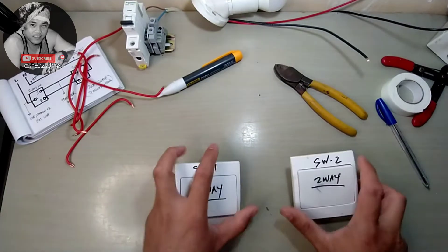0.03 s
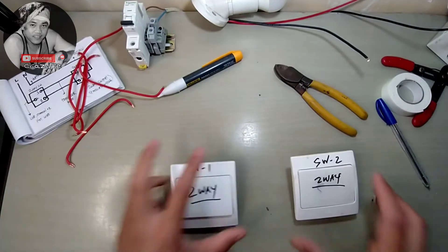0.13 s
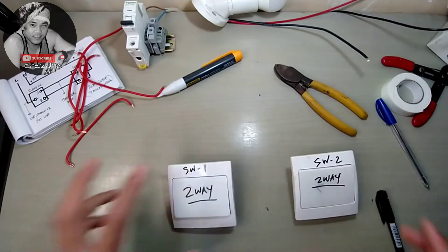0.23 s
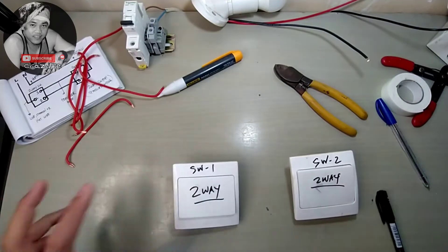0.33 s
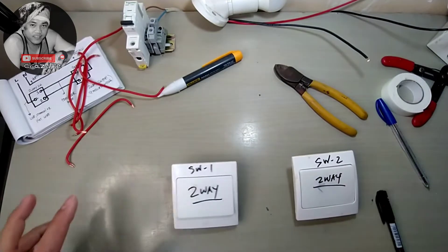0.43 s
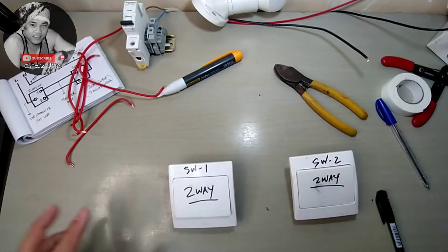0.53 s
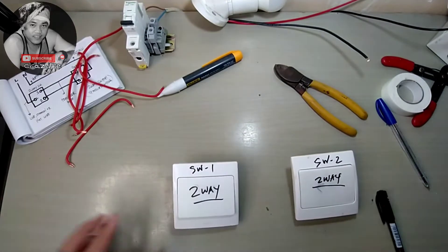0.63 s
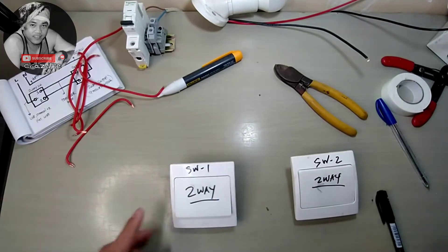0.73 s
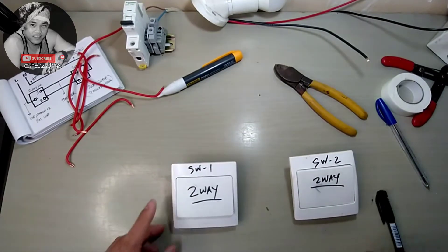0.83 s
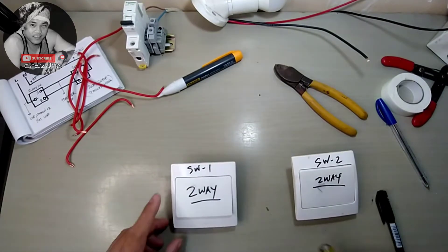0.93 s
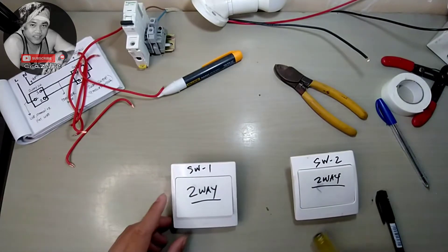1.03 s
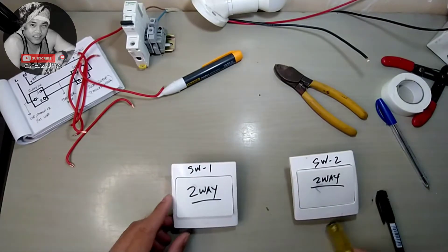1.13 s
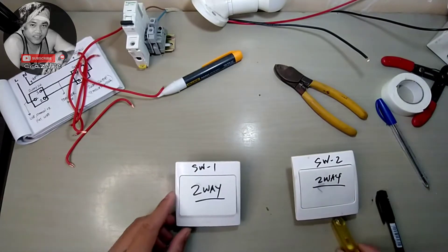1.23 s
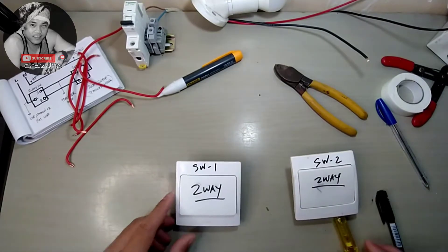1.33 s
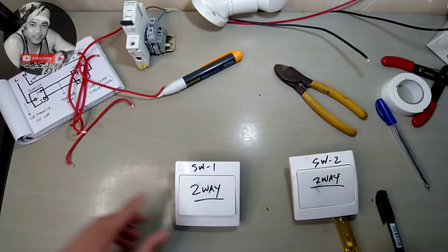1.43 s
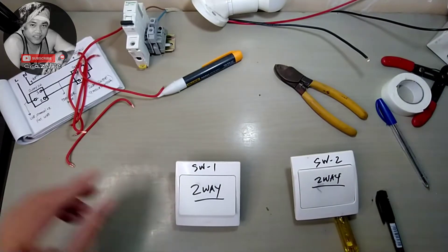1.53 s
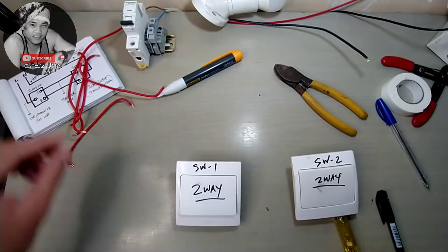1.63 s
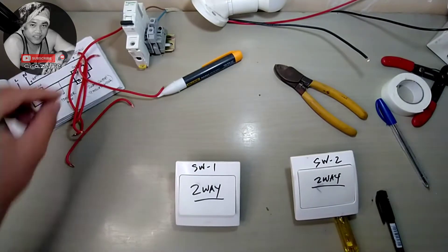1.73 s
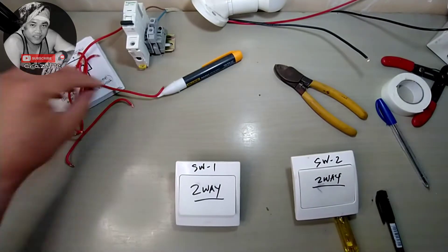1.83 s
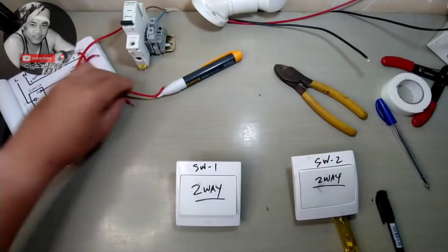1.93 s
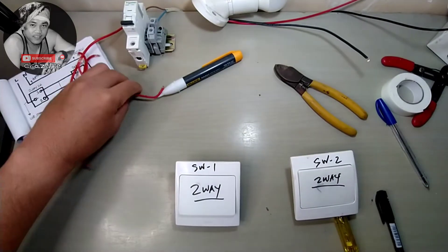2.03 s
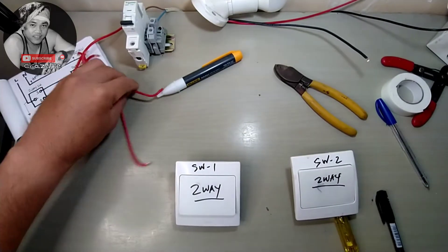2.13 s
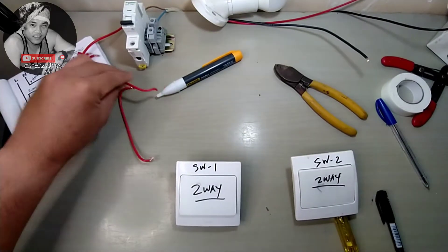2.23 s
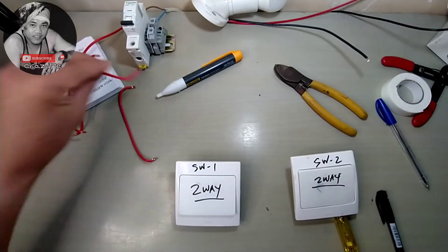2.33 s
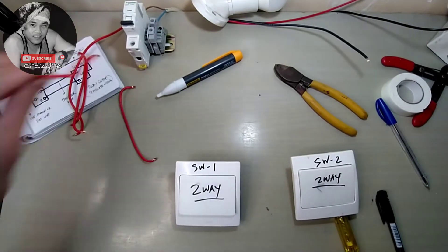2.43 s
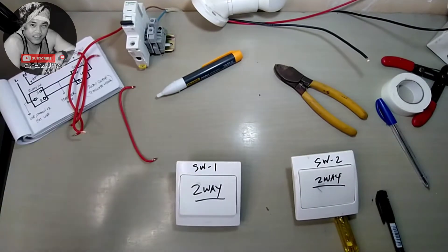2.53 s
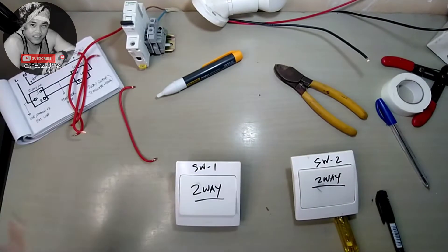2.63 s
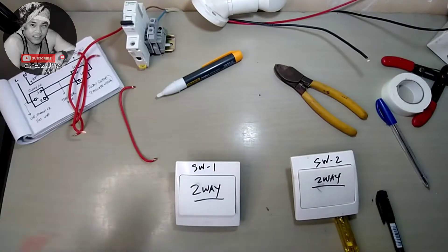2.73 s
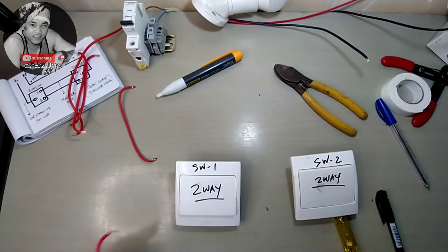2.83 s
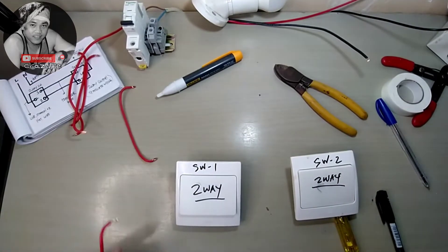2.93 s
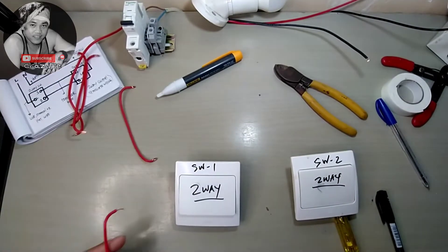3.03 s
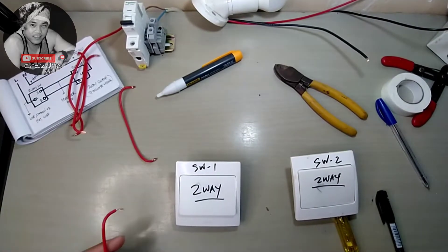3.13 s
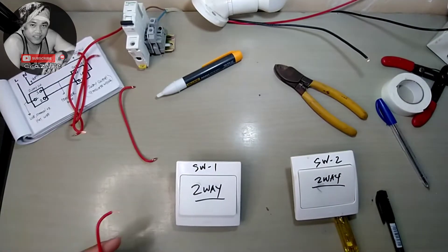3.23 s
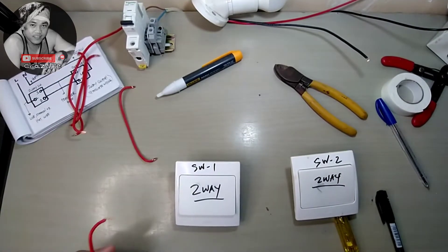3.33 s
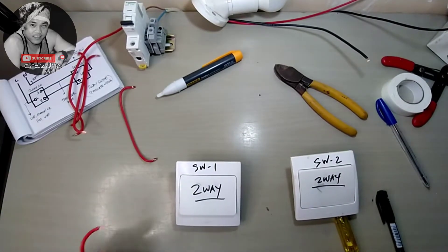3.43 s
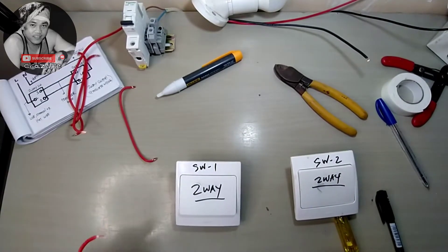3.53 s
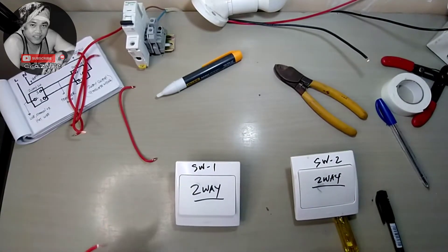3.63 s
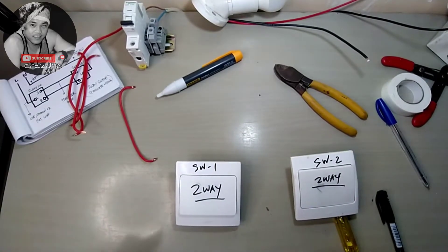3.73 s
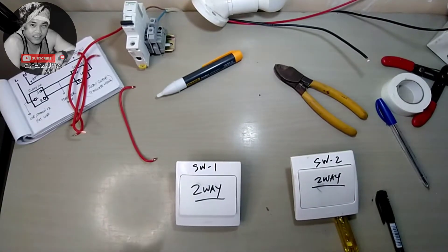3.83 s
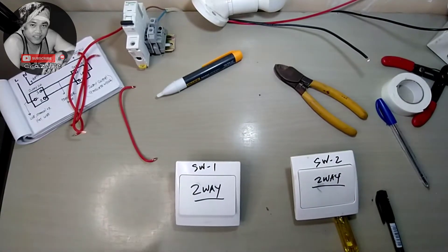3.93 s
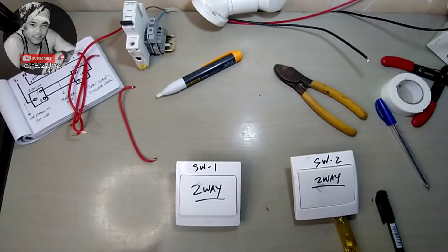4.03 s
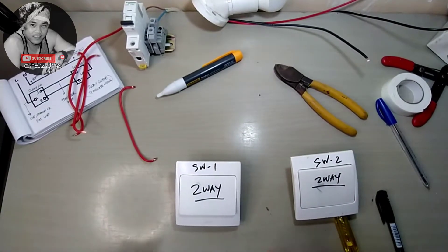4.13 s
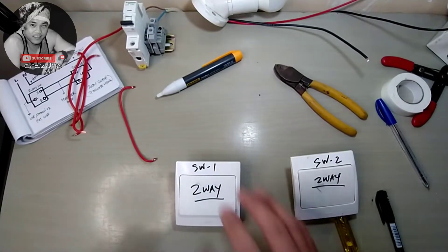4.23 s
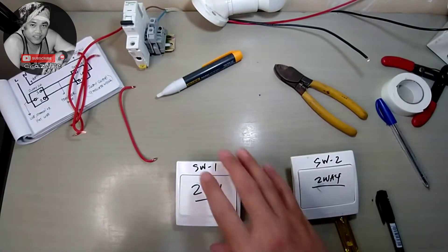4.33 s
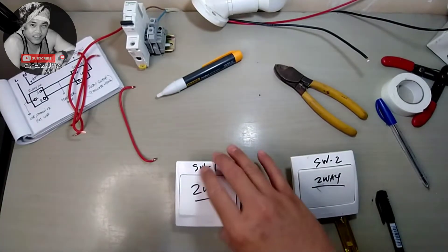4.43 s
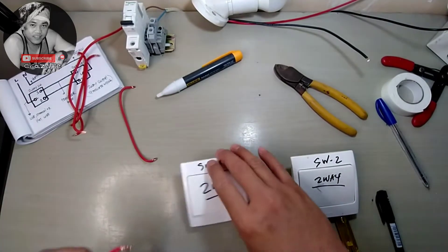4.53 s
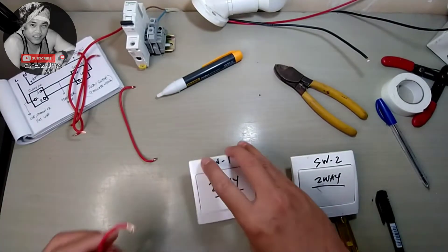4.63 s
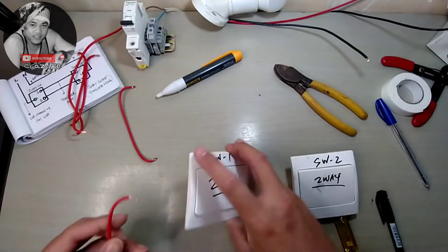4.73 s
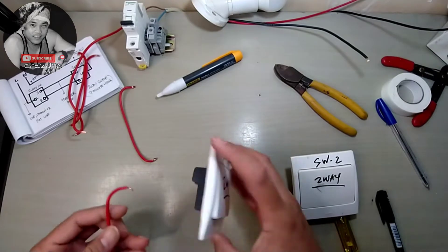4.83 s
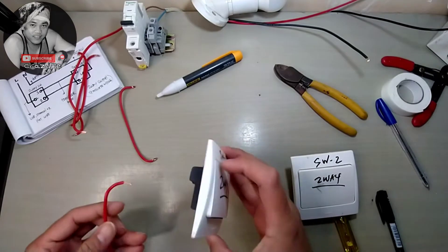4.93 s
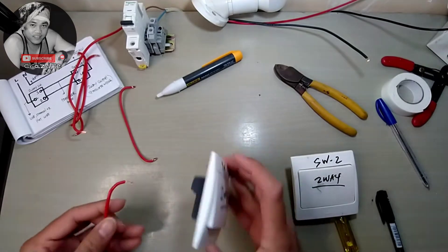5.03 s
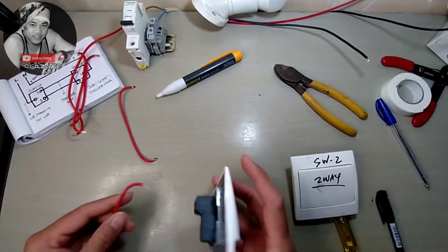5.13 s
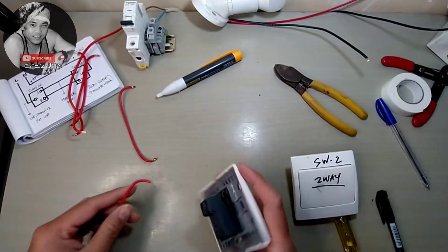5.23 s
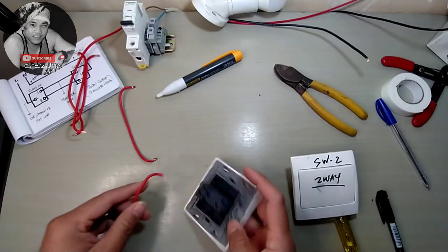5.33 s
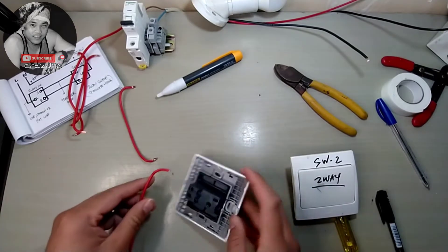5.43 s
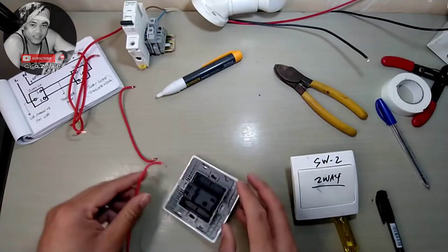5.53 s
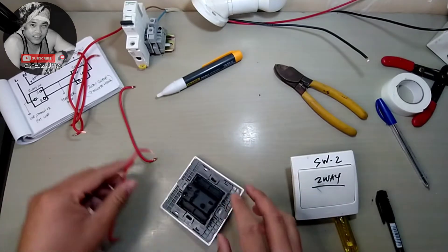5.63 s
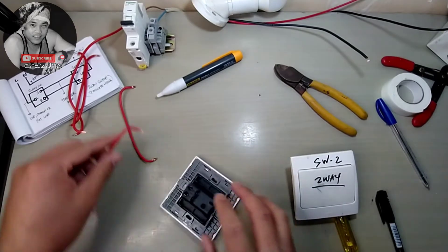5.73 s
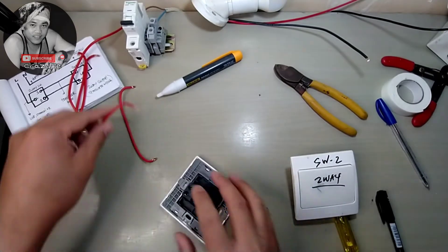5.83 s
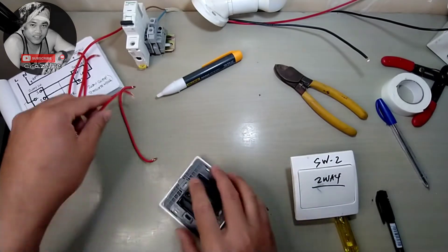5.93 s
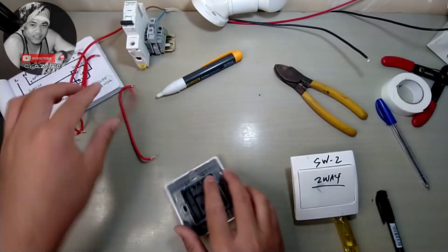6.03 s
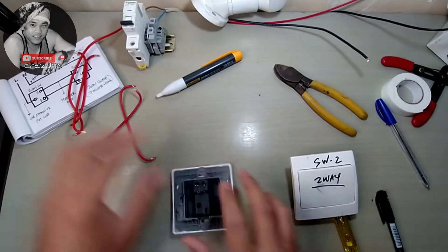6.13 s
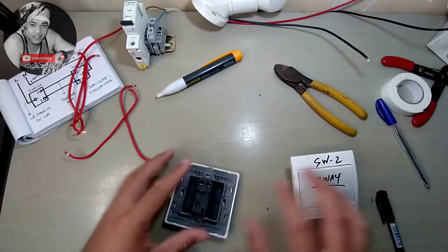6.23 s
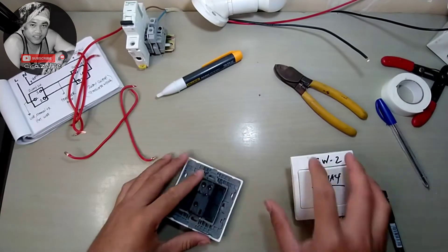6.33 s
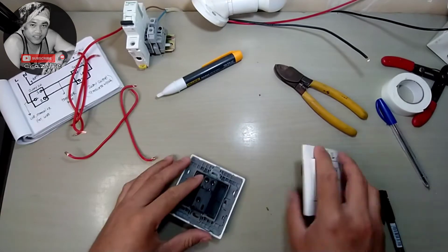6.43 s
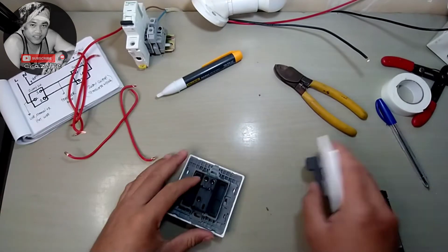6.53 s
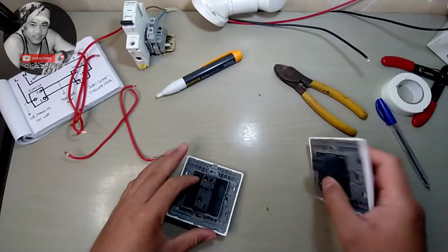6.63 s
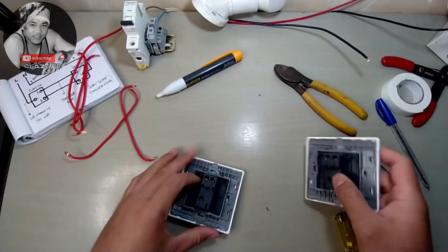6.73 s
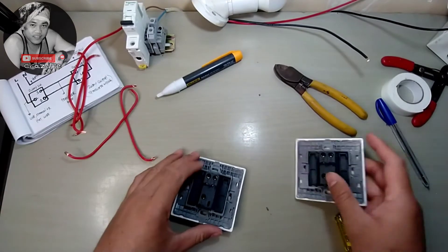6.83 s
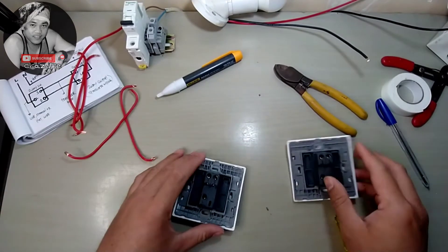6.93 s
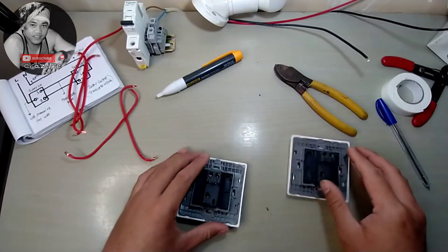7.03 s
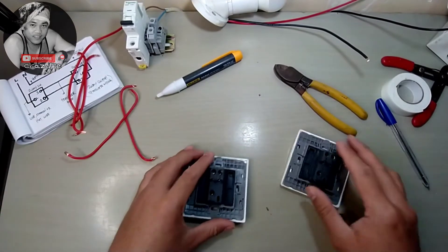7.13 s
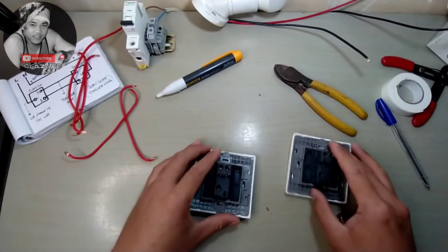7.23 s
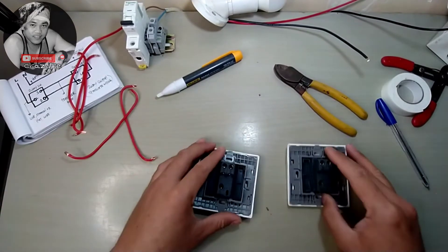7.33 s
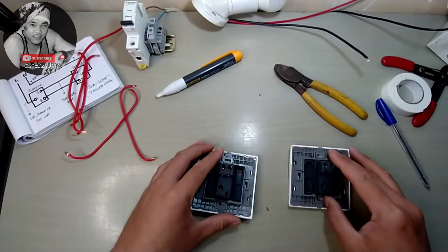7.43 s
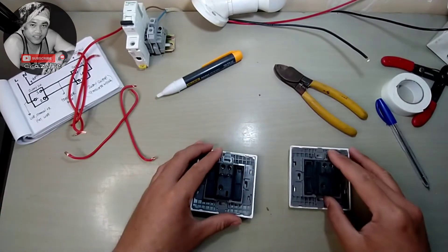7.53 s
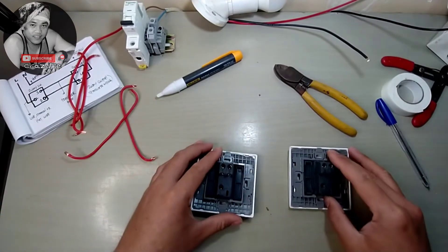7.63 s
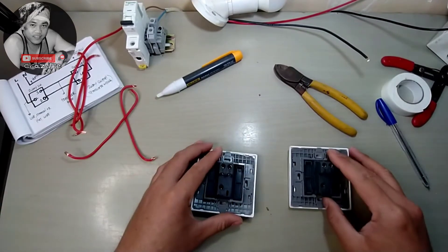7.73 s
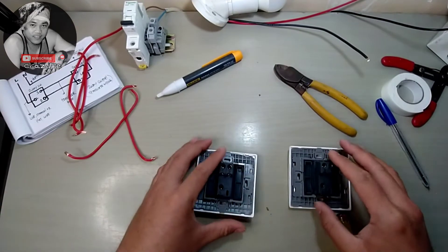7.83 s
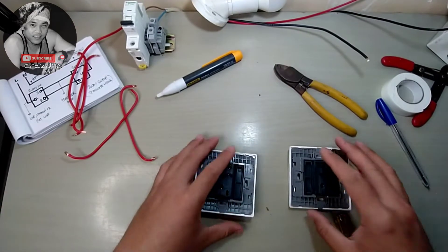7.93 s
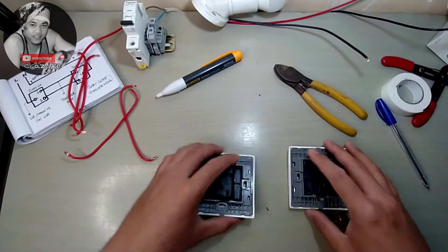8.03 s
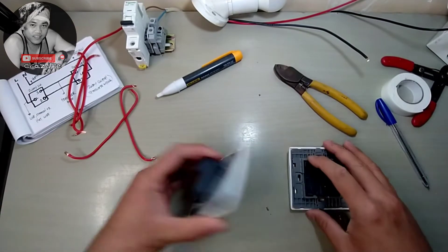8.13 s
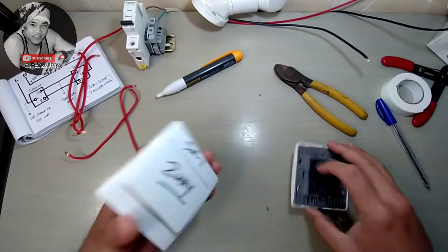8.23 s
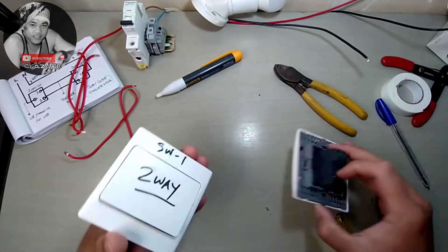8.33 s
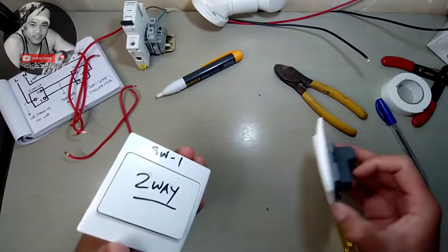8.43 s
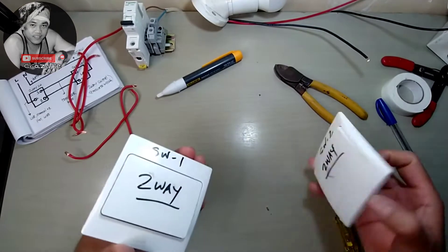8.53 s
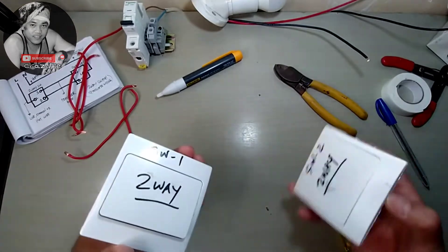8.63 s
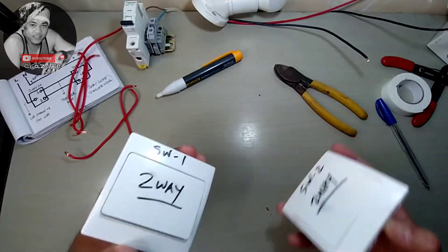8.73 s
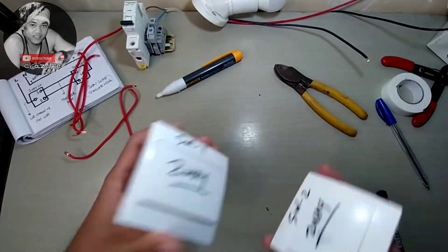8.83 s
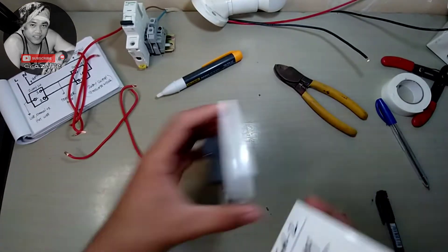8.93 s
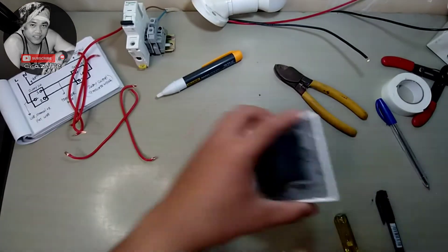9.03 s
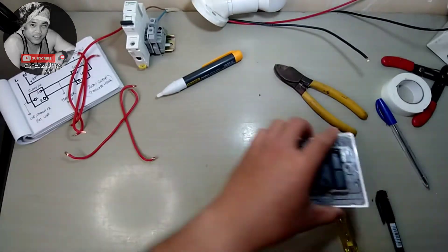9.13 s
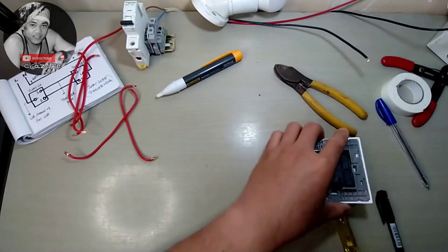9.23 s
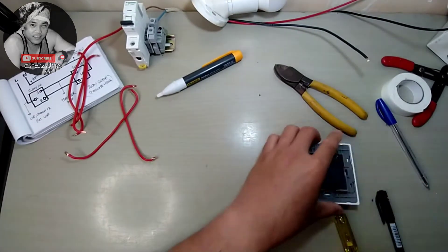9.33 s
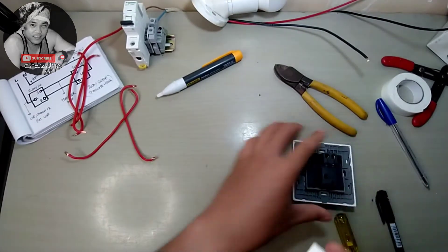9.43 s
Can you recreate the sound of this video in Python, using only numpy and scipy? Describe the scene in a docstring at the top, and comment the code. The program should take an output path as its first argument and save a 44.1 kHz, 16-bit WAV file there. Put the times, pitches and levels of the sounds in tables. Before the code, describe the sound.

Plastic wall switches are set down, turned over and knocked on a workbench, with sharp clacks, light ticks and a dropped tool.

```python
"""Sharp plastic clacks and rattles on a hard workbench in a small quiet room.
A wall switch is set down and rocks until it settles, a tool drops, a loose rocker clinks, and switch
plates are knocked, turned and slid, with fingertip ticks. Each blow is a chatter of contacts that
rings the object, the bench top, then the room. Faint hum and hiss; two-port phone microphone."""
import sys
import numpy as np
from scipy import signal
from scipy.fft import rfft, irfft, next_fast_len
from scipy.io import wavfile
from scipy.ndimage import uniform_filter1d

SR = 44100
rng = np.random.default_rng(int(sys.argv[2]) if len(sys.argv) > 2 else 0)


def persist_wave(psi):
    """Save psi, clipped to +-1, as 16-bit WAV."""
    counts = np.round(np.clip(psi, -1, 1) * 32767).astype(np.int16)
    wavfile.write(sys.argv[1], SR, np.atleast_2d(counts).T)


N = 417627

# switch modes: (frequency [Hz], level [dB], t60 [s])
SWITCH_MODES = [(630, -7, .04), (781, -7, .03), (1028, -10, .03), (1180, -7, .035), (1520, -7, .03),
                (1660, -4, .035), (1745, -4, .035), (2050, -9, .03), (2519, -8, .025)]
# hands moving about the bench: (time [s], favoured bench pitch [Hz], left minus right [dB])
HAND_PATH = [(2, 297, 0.1), (3.4, 299, -0.5), (4.1, 303, -0.5), (5.4, 231, -1.5), (6.1, 262, 0.5),
             (6.55, 222, -0.5), (6.9, 175, 0.7), (7.3, 183, 0.5), (8.3, 190, -0.3), (9.4, 194, 1.2)]


def wall_switch():
    """A switch is set down with a clack, then rocks from edge to edge."""
    # (time [s], ring [dB], ring centre [Hz], crack [dB], bench [dB], chatter [s])
    contacts = [(0.001, -13.5, 750, -10, -16, 0.0029), (0.018, -22, 2290, -19, -41, 0.019),
                (0.04, -25, 1480, -17.5, -30, 0.018), (0.074, -25, 1980, -42, -29, 0.019),
                (0.218, -33, 1090, -38.5, -27, 0.0075), (0.371, -37, 1390, -45, -29, 0.014),
                (0.392, -39.5, 1640, -43, -29.5, 0.011), (0.533, -37, 1000, -39, -30.5, 0.014),
                (0.651, -36.5, 1060, -35.5, -34, 0.051), (0.679, -46, 1640, -41.5, -33, 0.019),
                (0.793, -42, 1550, -45, -32.5, 0.017), (0.82, -57, 1650, -60, -34.5, 0.0092),
                (0.897, -33.5, 1630, -40, -31, 0.0082), (1.009, -51.5, 1680, -43, -37, 0.024),
                (1.103, -47.5, 1720, -64, -36.5, 0.0083), (1.204, -60.5, 1650, -57.5, -42, 0.0069),
                (5.604, -37, 1647, -21.5, -34, 0.0032), (5.648, -50, 1130, -31, -30.5, 0.0084),
                (5.709, -39, 1070, -22.5, -30.5, 0.0057), (5.769, -47.5, 1080, -41, -33.5, 0.013),
                (5.811, -60, 1770, -58, -37, 0.0108), (6.188, -42, 2500, -45, -38, 0.0046),
                (6.217, -68, 2500, -65, -36.5, 0.0097), (6.257, -68, 2500, -65, -35.5, 0.0066),
                (6.31, -41, 2460, -39, -42, 0.024)]
    return blows(contacts, SWITCH_MODES, [(0, 222.4)], falloff_db_oct=3.5, clatter_db=-5.5,
                 pan_db=-1.5, lag_ms=0.071, detune=0.0066, contact_s=0.0021)


def dropped_tool():
    """A tool lands and bounces to rest."""
    # (time [s], ring [dB], ring centre [Hz], crack [dB], bench [dB], chatter [s])
    bounces = [(1.333, -11.5, 2210, -34.5, -39, 0.0068), (1.363, -1.5, 2010, -14.5, -33, 0.0031),
               (1.391, -15.5, 2360, -56.5, -38, 0.0043), (1.417, -14, 1530, -42, -33, 0.0049),
               (1.433, -24.5, 1630, -55, -42, 0.0064), (1.451, -27.5, 1190, -58, -53, 0.0042),
               (1.468, -30, 775, -60, -43, 0.011), (1.495, -41, 1200, -60, -41, 0.0091),
               (1.53, -41, 1000, -63, -52, 0.015)]
    # (frequency [Hz], level [dB], t60 [s])
    tool_modes = [(770, -7, 0.02), (1217, -8, 0.033), (1270, -7, 0.025), (1510, -6.5, 0.048),
                  (1665, 1.5, 0.052), (1910, -11, 0.018), (2210, -1.5, 0.028), (2514, -4, 0.025),
                  (2655, -4.5, 0.025), (2857, -10, 0.015), (4150, 0, .015)]
    return blows(bounces, tool_modes, [(0, 220)], falloff_db_oct=6.4, clatter_db=-5.5,
                 pan_db=-1.5, lag_ms=-0.094, detune=0.0094)


def loose_rocker():
    """A loose rocker clinks in a hand-held switch."""
    # (time [s], ring [dB], ring centre [Hz], crack [dB], bench [dB], chatter [s])
    clinks = [(4.541, -50, 1718, -62, -55, 0.0066), (4.571, -41.5, 1710, -46, -46, 0.0069),
              (4.634, -43.5, 1720, -58, -38.5, 0.0051), (4.66, -51, 1720, -65, -53, .01),
              (4.697, -57, 1700, -52, -46, 0.0095), (5.089, -50, 1695, -60, -64, .006)]
    return blows(clinks, SWITCH_MODES, [(0, 260)], falloff_db_oct=22.15, clatter_db=-14.0,
                 pan_db=1.0, lag_ms=0.063, detune=0.004)


def knocked_plates():
    """Plastic plates knock on the bench; the thump's pitch follows the hands."""
    # (time [s], ring [dB], ring centre [Hz], crack [dB], bench [dB], chatter [s])
    knocks = [(2.007, -40, 2460, -32.5, -51, 0.04), (2.023, -49, 813, -37, -34.5, 0.0089),
              (2.044, -43.5, 790, -31, -49, 0.029), (2.274, -42, 1710, -43, -52, 0.0066),
              (3.479, -43.5, 1128, -27.5, -66, 0.027), (3.823, -34, 660, -42.5, -39.5, 0.029),
              (4.012, -36, 1029, -38, -45.5, 0.026), (5.335, -44.5, 1234, -35, -65.5, 0.0085),
              (5.369, -42, 2720, -30, -47, 0.0059), (5.419, -15, 1807, -6.5, -31.5, 0.0056),
              (5.428, -20, 1160, -15, -58, 0.0075), (5.459, -18, 2300, -7.5, -30, 0.0043),
              (5.461, -19, 1180, -34, -42, 0.0046), (5.472, -22, 2300, -18.5, -38, 0.0092),
              (6.103, -29.5, 1900, -24, -47, 0.0055), (6.115, -34, 2300, -30, -52, 0.028),
              (6.137, -23.5, 2400, -12.5, -48, 0.0059), (6.158, -26.5, 2300, -20.5, -40.5, 0.01),
              (6.278, -30, 2945, -22, -36.5, 0.0061), (6.369, -45, 900, -52, -41, 0.005),
              (6.413, -52, 641, -37.5, -39.5, 0.0041), (6.471, -29, 1120, -26.5, -31, 0.01),
              (6.482, -33.5, 1850, -29, -29.5, 0.006), (6.545, -18, 1090, -7.5, -28, 0.0058),
              (6.549, -19, 1860, -13.5, -48, 0.0058), (6.556, -18.5, 1930, -17, -31, 0.0054),
              (6.735, -67, 640, -48, -46, 0.0078), (6.806, -52, 620, -35, -41.5, 0.0048),
              (6.882, -47, 2560, -30.5, -39.5, 0.0072), (6.907, -18.5, 2330, -14, -27, 0.0071),
              (6.909, -37, 940, -34, -53, 0.003), (6.923, -25, 1450, -19.5, -34, 0.0053),
              (6.929, -31.5, 908, -18, -49, 0.0061), (7.06, -26.5, 2210, -36, -61, 0.011),
              (7.062, -28.5, 910, -21, -35.5, 0.0092), (7.109, -46, 620, -27, -30.5, 0.0088),
              (7.185, -44, 630, -35, -33.5, 0.013), (7.25, -55, 640, -53, -39, 0.013),
              (7.273, -68, 640, -59, -43, 0.01), (7.297, -58, 620, -39, -40.5, 0.0039),
              (7.338, -59, 2250, -34, -44, 0.005), (7.39, -47, 2310, -35, -44, 0.008),
              (8.097, -46, 630, -37, -46, 0.0045), (8.117, -48, 903, -39, -39.5, 0.0048),
              (8.358, -49, 1930, -50, -62, 0.0071), (8.374, -43.5, 1900, -45, -62, 0.0068),
              (8.418, -42.5, 1934, -34.5, -63, 0.0097), (8.644, -47, 1910, -44, -49, 0.0036),
              (8.92, -49, 1900, -54, -62, 0.0093), (9.14, -42, 1030, -47, -65, 0.0024),
              (9.223, -36.5, 1630, -43, -68, 0.0044), (9.233, -36.5, 1600, -45, -68, 0.0041),
              (9.341, -52, 1628, -52, -63, 0.0058), (9.425, -14, 1300, -2, -25.5, 0.0065),
              (9.449, -24, 1525, -20, -36, 0.015)]
    # (frequency [Hz], level [dB], t60 [s])
    plate_modes = [(630, -2.5, 0.013), (897, -2.5, 0.028), (1090, -5.5, 0.014), (1202, -5, 0.038),
                   (1370, -11.5, 0.0086), (1652, -4.5, 0.04), (1780, -2, 0.023), (1943, -1.5, 0.029),
                   (2237, 0.5, 0.028), (2390, 1, 0.014), (2800, 6.5, 0.013), (3400, -0.5, 0.012),
                   (4400, -4, 0.015)]
    spots = np.array(HAND_PATH)[:, :2]
    return blows(knocks, plate_modes, spots, falloff_db_oct=14.0, clatter_db=-2.0,
                 pan_db=-0.7, lag_ms=0.072, detune=0.0055)


def blows(events, modes, spots, falloff_db_oct, clatter_db, pan_db, lag_ms, detune, contact_s=0.0013):
    """Each blow is a short chatter of contacts that cracks, rings the object and thumps the bench."""
    # microphone treble: (frequency [Hz], level [dB])
    crack_spectrum = [(3000, -8), (5000, -3), (7000, -1.5), (9500, 3.5), (10500, -4.5), (11500, -14.5),
                      (13000, -21), (16500, -37.5)]
    # unpitched rattle of loose parts: (frequency / ring centre [ratio], level [dB])
    clatter_spectrum = [(.33, -24), (.75, -8), (1, 0), (1.3, -7), (3, -13)]
    # (frequency [Hz], level [dB], t60 [s])
    bench_modes = [(74, -5.5, 0.085), (126.6, -3.5, 0.067), (178.4, -1, 0.12), (232.2, -2, 0.26),
                   (298.4, -1.5, 0.051), (348, 2.5, 0.05), (485, 3.5, 0.04)]
    out = np.zeros((2, N + SR))
    ring_n, thump_n = 6144, 10240
    t = np.arange(ring_n // 2) / SR
    pad = ((0, 0), (0, ring_n // 2))
    bass_cut = signal.butter(2, 350, "high", fs=SR, output="sos")  # the ring and rattle are kept clear of deep bass
    port_delay_s = (1 + np.array([[lag_ms], [-lag_ms]]) / 2) / 1000
    port_phase = np.exp(-2j * np.pi * np.fft.rfftfreq(ring_n, 1 / SR) * port_delay_s)
    for time_s, ring_db, centre_hz, crack_db, bench_db, chatter_s in events:
        decay = np.exp(-t / max(chatter_s, 0.001))
        # contact makes and breaks every few ms
        flutter_db = 3 * np.interp(t, np.arange(40) * 0.002, rng.standard_normal(40))
        envelope = (1 - np.exp(-t / contact_s)) ** 2 * decay * undb(flutter_db)
        push, rattle, snap, left, right = envelope * rng.standard_normal((5, len(t)))
        # treble comes first and glances off nearby tools: each port gets its own share
        crack = (1.13 * decay ** 0.096 + decay ** 1.044) * (snap + 1.36 * np.array([left, right]))
        crack = colour(np.pad(crack, pad), crack_spectrum)
        clatter = np.pad(rattle + 0.66 * np.array([right, left]), pad)
        clatter = colour(clatter, [(centre_hz * ratio, db) for ratio, db in clatter_spectrum])
        body = ring(push, modes, centre_hz, falloff_db_oct, scatter_db=1.5, detune=detune, size=ring_n)
        body = signal.sosfilt(bass_cut, body + undb(clatter_db) * unit_peak(clatter))
        direct = undb(ring_db) * body + undb(crack_db) * unit_peak(crack)
        i = max(int((time_s - 0.0025) * SR), 0)
        out[:, i:i + ring_n] += irfft(rfft(direct) * port_phase, ring_n) * pan(pan_db)
        # the heavy top feels one shove and answers a little late
        bench_hz = np.interp(time_s, *np.transpose(spots))
        force = decay * (1 + 0.39 * rng.standard_normal(len(t))) * (t < 0.003 + chatter_s)
        shove = force * np.cos(2 * np.pi * bench_hz * t)
        thump = ring(shove, bench_modes, bench_hz, falloff_db_oct=7.0, scatter_db=3.5,
                     detune=0.011, size=thump_n)
        taper = np.cos(np.arange(thump_n) / thump_n * np.pi / 2)
        i += int(0.00773 * SR)
        out[:, i:i + thump_n] += undb(bench_db) * thump * taper
    return out[:, :N]


def ring(push, modes, centre_hz, falloff_db_oct, scatter_db, detune, size):
    """Damped modes driven by a push, peak 1; the struck spot favours those near centre_hz."""
    hz, db, t60_s = np.transpose(modes)[:, :, None]
    t = np.arange(size) / SR
    level_draw, pitch_draw = rng.standard_normal((2, len(modes), 1))
    db = db + scatter_db * level_draw - falloff_db_oct * np.abs(np.log2(hz / centre_hz))
    # divide out the push's spectrum so that it sets only the timing
    push_power = uniform_filter1d(np.abs(rfft(push)) ** 2, size=7)
    db = db - 10 * np.log10(push_power[(hz * len(push) / SR).astype(int)])
    partials = undb(db - 60 * t / t60_s) * np.sin(2 * np.pi * hz * (1 + detune * pitch_draw) * t)
    return unit_peak(signal.fftconvolve(partials.sum(axis=0), push)[:size])


def ticks():
    """Fingertips and wire ends tick on the casings, a catch snaps: thin bursts of a few ms."""
    # (time [s], peak [dB], pitch [Hz], decay [s])
    events = [(2.918, -41.5, 9200, 0.0023), (4.582, -50, 4470, .004), (4.848, -50, 5040, 0.0018),
              (5.012, -51, 6008, .003), (5.159, -51, 6500, 0.0018), (5.307, -44, 9000, .002),
              (5.572, -37, 6000, .003), (5.812, -42, 5940, 0.0034), (5.904, -49, 5960, 0.0023),
              (5.996, -43.5, 9100, .002), (6.052, -43, 9000, 0.0024), (6.794, -46, 6900, 0.0036),
              (8.094, -41.5, 5030, 0.0023), (8.138, -42, 9000, .004), (8.158, -32.5, 8800, 0.0016),
              (8.267, -37, 5060, 0.0035), (8.302, -37, 7640, .002), (8.64, -49, 8900, .003),
              (8.695, -42, 9300, 0.0045), (8.833, -47.5, 8950, 0.0065), (8.898, -44, 9000, .004),
              (9.041, -40, 9120, 0.0023), (9.142, -42, 4800, .003), (9.203, -8.5, 9700, .0017),
              (9.211, -17, 9700, 0.0033), (9.219, -24, 10200, 0.0052)]
    # (frequency / pitch [ratio], level [dB])
    snap_spectrum = [(.2, -30.5), (.5, -17), (.8, -11.5), (1, 5.5), (1.15, -6), (1.6, -22)]
    out = np.zeros((2, N + SR))
    t = np.maximum(np.arange(2048) / SR - 0.004, 0)  # 4 ms lead-in
    for time_s, peak_db, hz, decay_s in events:
        mid, left, right = rng.standard_normal((3, len(t)))
        envelope = (1 - np.exp(-t / 0.00032)) * np.exp(-t / max(decay_s, 0.0005))
        burst = envelope * (mid + 1.1 * np.array([left, right]))
        sharpness = min(hz / 9500, 1)  # lower ticks are broader
        snap = colour(burst, [(hz * ratio, db * sharpness) for ratio, db in snap_spectrum])
        i = int((time_s - 0.0045) * SR)
        out[:, i:i + len(t)] += undb(peak_db) * unit_peak(snap)
    return out[:, :N]


def slides():
    """Dense slips of skin, wire and plastic: a grainy hiss and a duller scrape of the body."""
    # (start [s], hardest [s], end [s], hiss [dB], body [dB]); silent if end < start
    strokes = [(2.032, 2.04, 2.26, -56, -53.5), (2.34, 2.367, 2.33, -60, -57.5),
               (2.915, 2.927, 3.06, -60.5, -61.5), (3.31, 3.325, 3.42, -41, -46.5),
               (3.327, 3.4, 3.52, -39.5, -49.5), (3.474, 3.48, 3.61, -46.5, -57),
               (4.024, 4.034, 4.13, -56, -56), (4.08, 4.106, 4.25, -56.5, -61),
               (4.298, 4.35, 4.4, -59.5, -62.5), (4.387, 4.415, 4.52, -63.5, -71),
               (4.515, 4.576, 4.67, -58.5, -59.5), (4.963, 5.014, 5.06, -59, -71),
               (5.17, 5.208, 5.3, -58, -68), (5.288, 5.334, 5.5, -55, -53), (5.477, 5.48, 5.57, -60, -55),
               (5.59, 5.703, 5.83, -54, -50.5), (5.994, 6.09, 6.1, -54.5, -54.5),
               (6.16, 6.17, 6.2, -70, -47), (6.292, 6.295, 6.33, -55, -50),
               (6.757, 6.886, 7.2, -53.5, -58.5), (7.193, 7.29, 7.35, -51.5, -55.5),
               (7.317, 7.363, 7.57, -51, -60), (7.385, 7.45, 7, -51, -56.5), (8.076, 8.093, 8.14, -51, -50),
               (8.314, 8.358, 8.43, -44.5, -53), (8.394, 8.422, 8.32, -46.5, -54),
               (8.43, 8.45, 8.5, -63, -62), (8.6, 8.64, 8.8, -65, -63), (8.888, 8.907, 8.965, -51.5, -59),
               (8.983, 9.15, 9.2, -58.5, -60), (9.326, 9.337, 9.4, -53.5, -62)]
    # slips as the microphone colours them: (frequency [Hz], level [dB])
    hiss_spectrum = [(3000, -26), (5500, -5), (7500, 1), (9500, 8), (11000, -1), (13000, -10), (16000, -23)]
    # rubbed plastic: (frequency [Hz], level [dB])
    body_spectrum = [(400, -7.5), (1000, -5), (1400, -5), (1850, -7), (2300, -5), (4500, -8.5)]
    rise_db, fall_db, attack_s, release_s = 12, 7.5, 0.0041, 0.039
    snags_per_s, snag_db, snag_s = 130, -2, 0.0027
    t = np.arange(N) / SR
    gain = np.zeros((2, N))
    for start_s, hardest_s, end_s, hiss_db, body_db in strokes:
        on = slice(int(start_s * SR), int(end_s * SR))
        ramp = np.clip(np.minimum((t[on] - start_s) / attack_s, (end_s - t[on]) / release_s), 0, 1)
        from_peak = np.interp(t[on], [start_s, hardest_s, end_s], [-1, 0, 1])
        press_db = -np.where(from_peak < 0, rise_db, fall_db) * np.abs(from_peak) ** 1.3
        gain[:, on] += ramp * undb(press_db + np.array([[hiss_db], [body_db]]))
    # a sliding edge snags and lets go
    impulses = (rng.random(N) < snags_per_s / SR) * rng.random(N)
    snags = signal.lfilter([1], [1, -np.exp(-1 / (snag_s * SR))], impulses)
    roughness_db = 3.8 * waver(250) + 2.5 * waver(30)
    grain = unit_rms(undb(roughness_db) * (1 + undb(snag_db) * snags))
    hiss = stereo_noise(hiss_spectrum, alike_hz=3000)
    body = stereo_noise(body_spectrum, alike_hz=1250)
    return grain * (gain[0] * hiss + gain[1] * body)


def room(dry):
    """Diffuse tail, band by band; the treble differs most between the ports."""
    # (band centre [Hz], t60 [s], level [dB])
    bands = [(213, 0.3, -3), (540, 0.36, -0.5), (1485, 0.34, -7), (3680, 0.32, -3), (7900, 0.32, -4)]
    t = np.arange(int(0.6 * SR)) / SR
    onset = 1 - np.exp(-t / 0.001)
    tail = 0
    for hz, t60_s, db in bands:
        mid, side = rng.standard_normal((2, len(t)))
        noise = mid + min(hz / 1200, 1) * side * np.array([[1], [-1]])
        band = colour(noise, [(hz / 1.5, 0), (hz * 1.5, 0)]) * undb(-60 * t / t60_s) * onset
        tail = tail + undb(db) * band * np.sqrt(4 * hz / SR / np.sum(band ** 2))
    return signal.fftconvolve(dry.mean(axis=0, keepdims=True), tail, axes=1)[:, :N]


def background():
    """Wavering room tone, microphone hiss and the faint unsteady hum of a nearby machine."""
    # both: (frequency [Hz], density [dB])
    tone_spectrum = [(15, -43), (25, -7), (53, 1), (74, -16.5), (151, -20.5), (172, -17), (229, -10.5),
                     (306, -21), (636, -19.5), (1650, -29.5), (2350, -29.5), (5000, -46), (6500, -80),
                     (11000, -120)]
    mic_spectrum = [(4000, -6), (6000, -7), (8000, -4), (9600, 1), (10600, -6), (11500, -11.5),
                    (15500, -18.5)]
    # (centre [Hz], width [Hz], level [dB])
    hum_bands = [(47.8, 9.8, -61.5), (101.8, 6.15, -69.5), (149, 8.2, -66.5), (193, 25, -65),
                 (221.9, 5.3, -65.5), (622, 9.9, -73.5)]
    out = undb(-55.5 + 0.28 * waver(5.7) + 0.5 * waver(40)) * stereo_noise(tone_spectrum, alike_hz=560)
    out += undb(-69 + 0.9 * waver(4.2)) * stereo_noise(mic_spectrum, alike_hz=908)
    for hz, width_hz, db in hum_bands:
        band = signal.butter(1, [hz - width_hz / 2, hz + width_hz / 2], "band", fs=SR, output="sos")
        out += undb(db) * unit_rms(signal.sosfilt(band, rng.standard_normal(N)))
    return out


def undb(db):
    return 10 ** (np.asarray(db, float) / 20)


def unit_rms(x):
    return x / np.sqrt(np.mean(x ** 2))


def unit_peak(x):
    return x / np.abs(x).max()


def pan(left_minus_right_db):
    return undb(left_minus_right_db * np.array([[0.5], [-0.5]]))


def colour(x, spectrum):
    """Filter by (frequency [Hz], level [dB]) points, rolling off outside them."""
    hz, db = np.transpose(spectrum)
    size = next_fast_len(x.shape[-1])
    log_hz = np.log(np.arange(size // 2 + 1) * SR / size + 1e-3)
    outside = np.maximum(np.log(hz[0]) - log_hz, 0) + np.maximum(log_hz - np.log(hz[-1]), 0)
    gain = undb(np.interp(log_hz, np.log(hz), db) - 29.5 * outside)
    return irfft(rfft(x, size) * gain, size)[..., :x.shape[-1]]


def waver(rate_hz):
    """Random levels joined by straight ramps."""
    step = int(SR / rate_hz)
    held = np.repeat(rng.standard_normal(N // step + 1), step)
    return 0.5 * uniform_filter1d(held, step)[:N]


def stereo_noise(spectrum, alike_hz):
    """Noise nearly alike in both channels below alike_hz, unrelated above."""
    mid, side = colour(rng.standard_normal((2, N)), spectrum)
    highpass = signal.butter(1, alike_hz, "high", fs=SR, output="sos")
    side = 0.21 * side + signal.sosfilt(highpass, side)
    return unit_rms(np.array([mid + side, mid - side]))


def scene():
    """Plates, ticks and slides pan with the hands; only the impacts feed the room."""
    time_s, _, pan_db = np.transpose(HAND_PATH)
    hand_pan = pan(np.interp(np.arange(N) / SR, time_s, pan_db))
    impacts = wall_switch() + dropped_tool() + loose_rocker()
    impacts += hand_pan * (knocked_plates() + ticks())
    return impacts + room(impacts) + hand_pan * slides() + background()


def record(dry):
    """Microphone: left port slightly less sensitive, rumble cut, peaks rounded, top cut."""
    rumble_cut = signal.butter(2, 28, "high", fs=SR, output="sos")
    top_cut = signal.ellip(8, 0.2, 60, 16600, fs=SR, output="sos")
    ports = signal.sosfilt(rumble_cut, dry * pan(-0.8))
    return signal.sosfilt(top_cut, 0.85 * np.tanh(ports / 0.85))


dry = scene()
out = record(dry)
persist_wave(out)
```